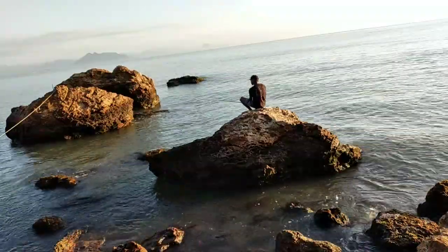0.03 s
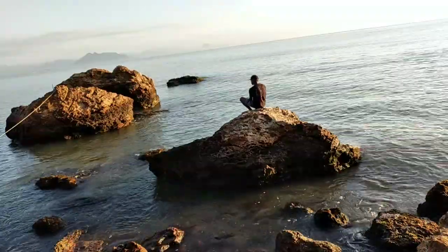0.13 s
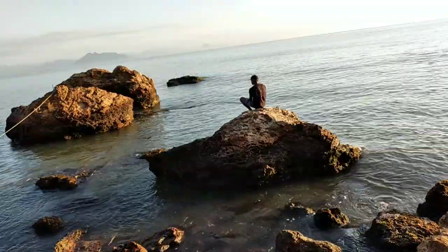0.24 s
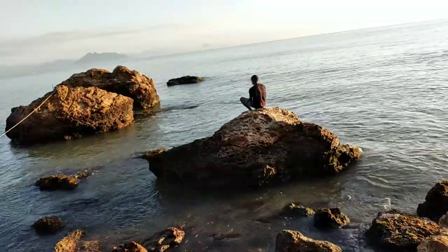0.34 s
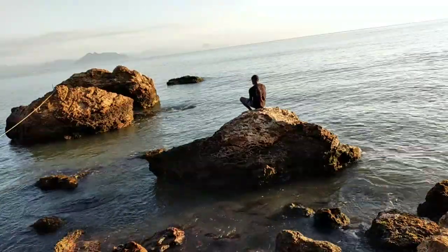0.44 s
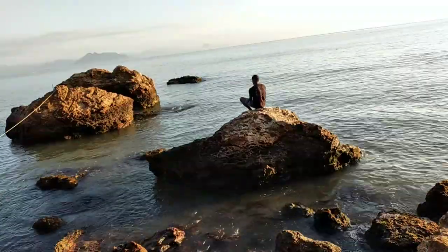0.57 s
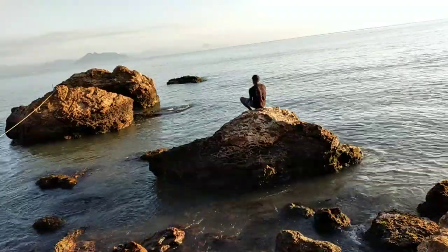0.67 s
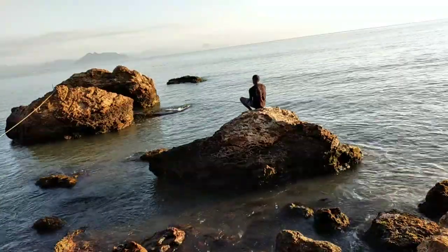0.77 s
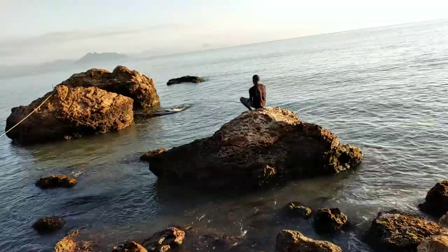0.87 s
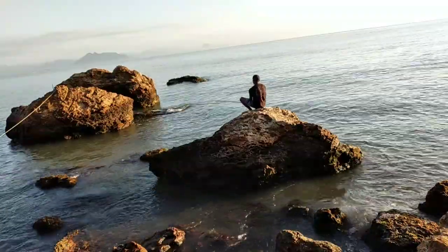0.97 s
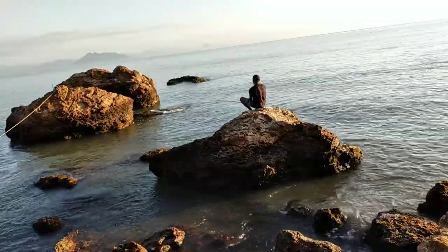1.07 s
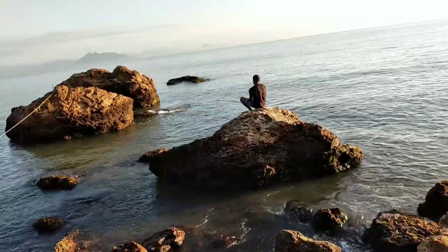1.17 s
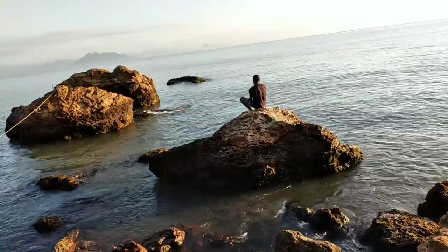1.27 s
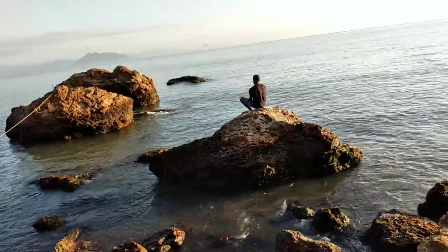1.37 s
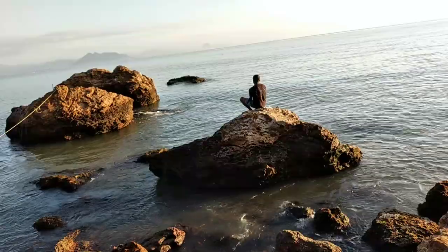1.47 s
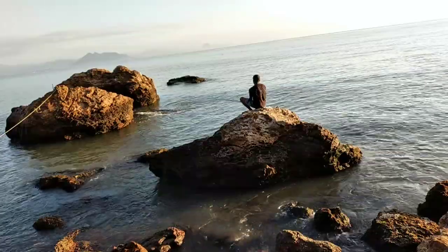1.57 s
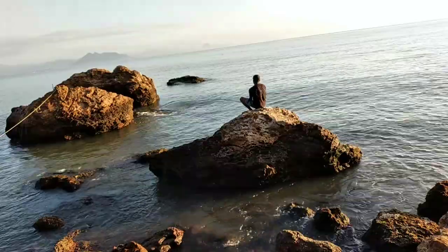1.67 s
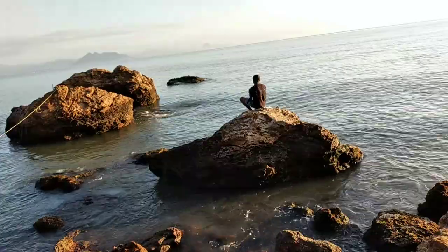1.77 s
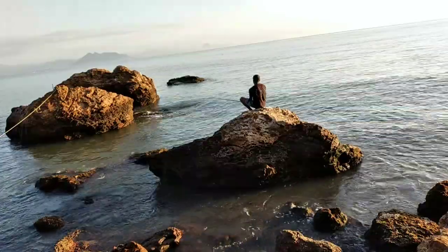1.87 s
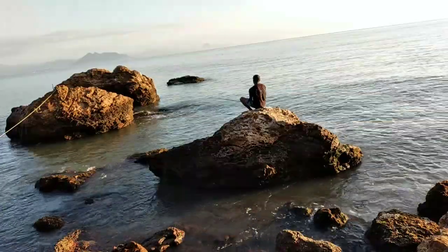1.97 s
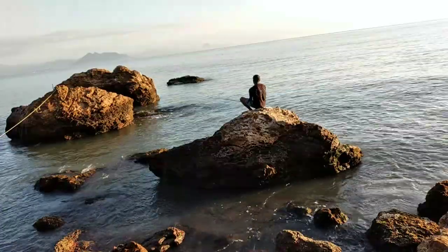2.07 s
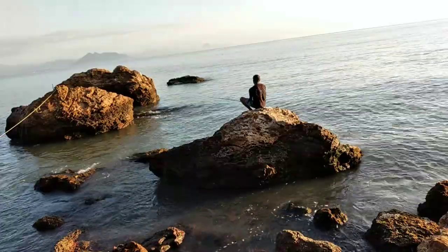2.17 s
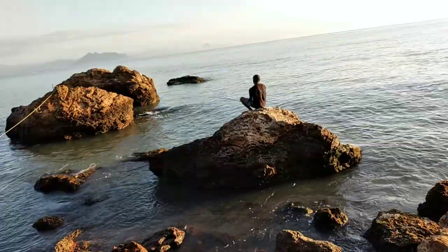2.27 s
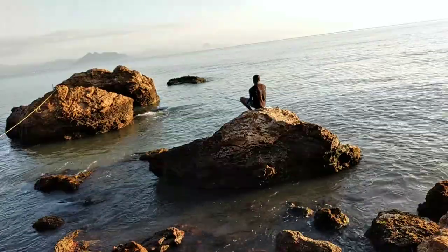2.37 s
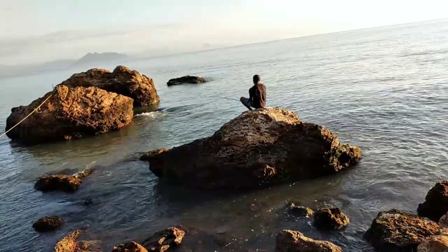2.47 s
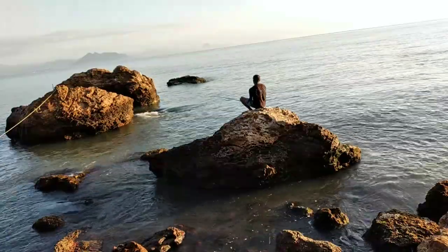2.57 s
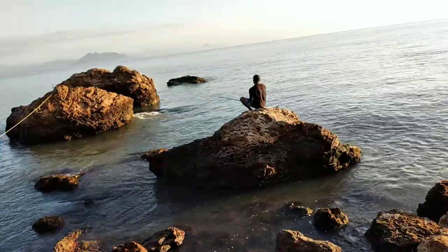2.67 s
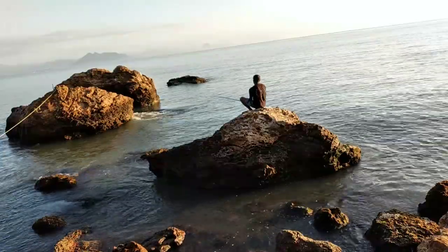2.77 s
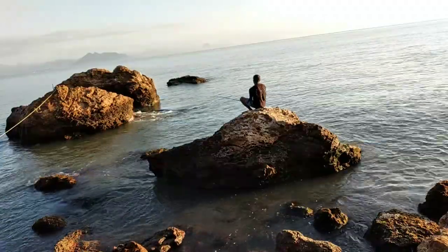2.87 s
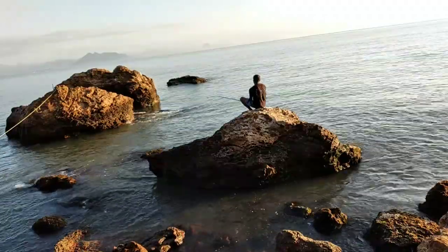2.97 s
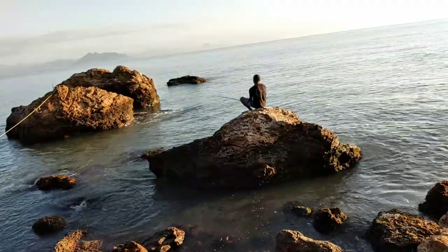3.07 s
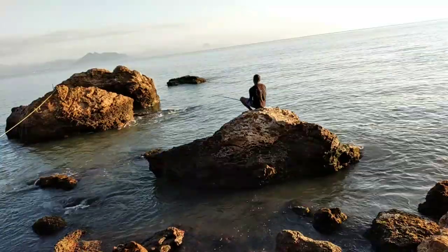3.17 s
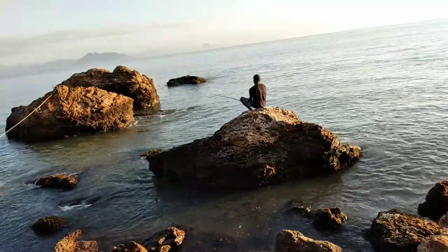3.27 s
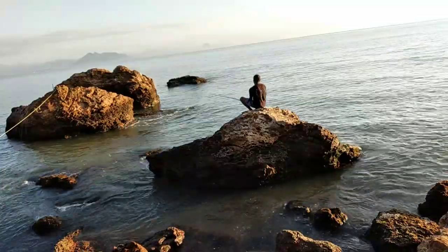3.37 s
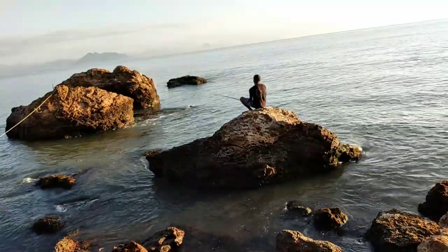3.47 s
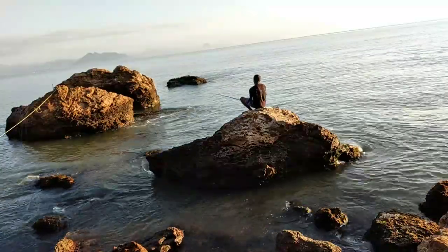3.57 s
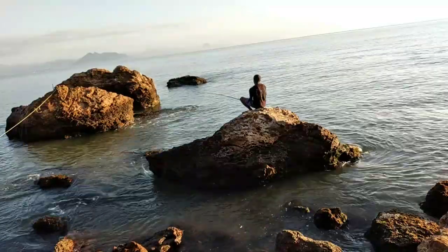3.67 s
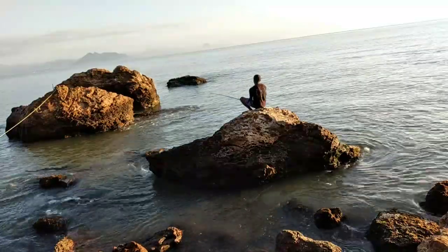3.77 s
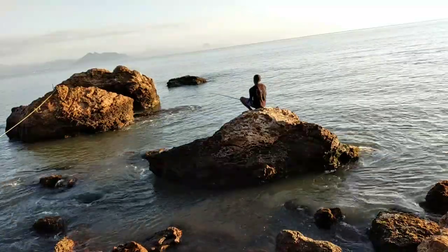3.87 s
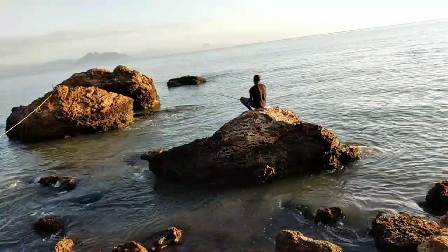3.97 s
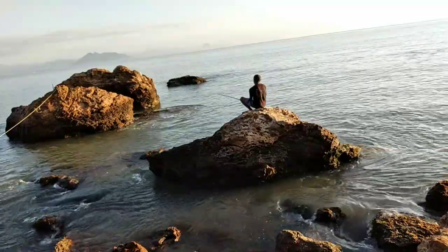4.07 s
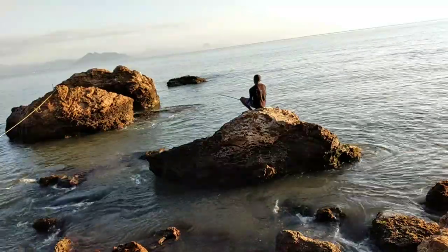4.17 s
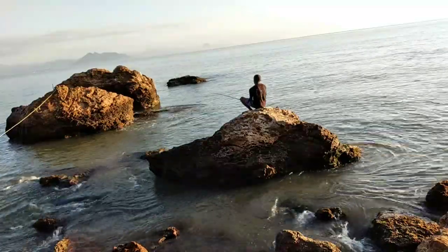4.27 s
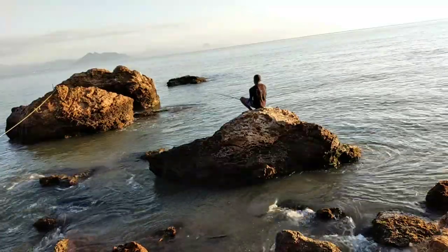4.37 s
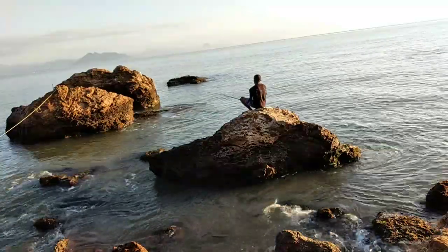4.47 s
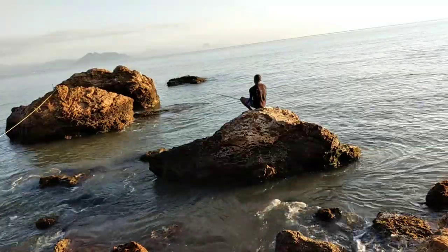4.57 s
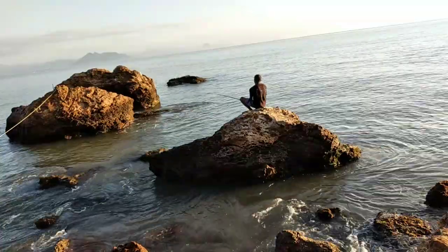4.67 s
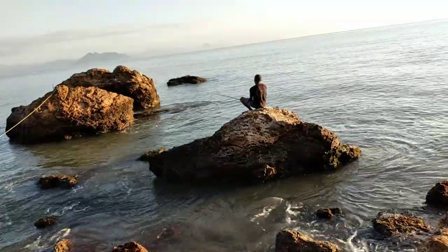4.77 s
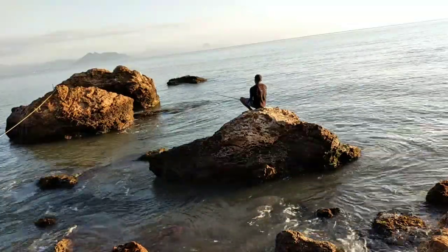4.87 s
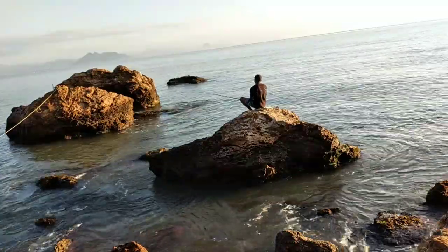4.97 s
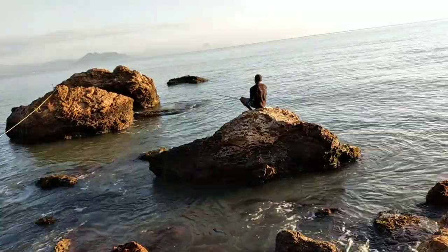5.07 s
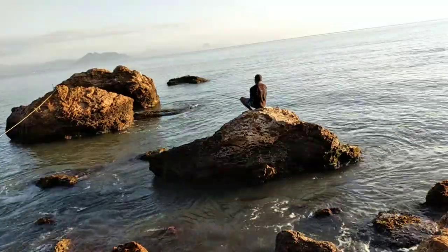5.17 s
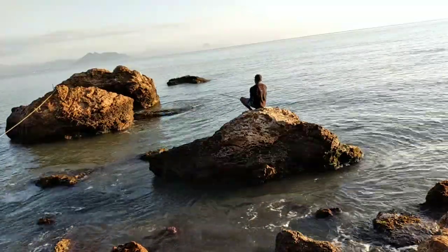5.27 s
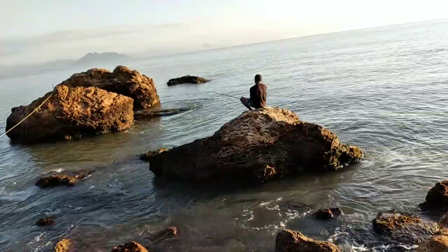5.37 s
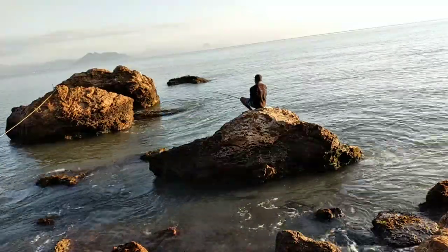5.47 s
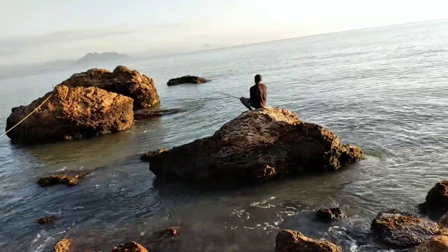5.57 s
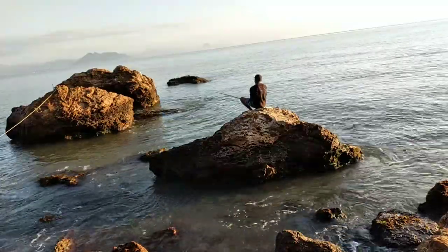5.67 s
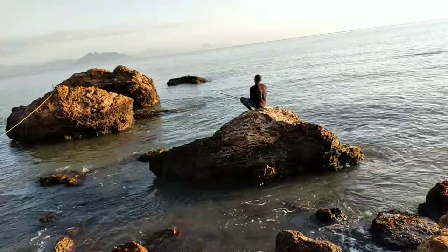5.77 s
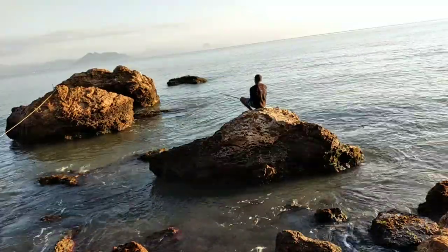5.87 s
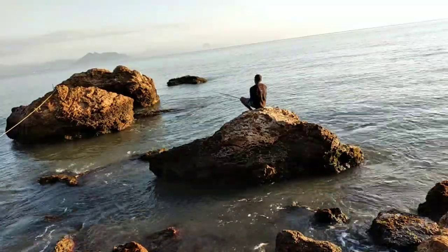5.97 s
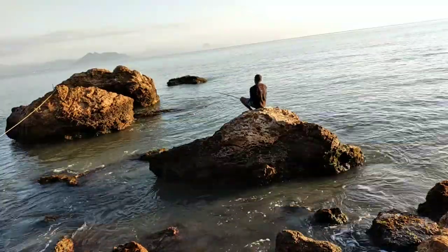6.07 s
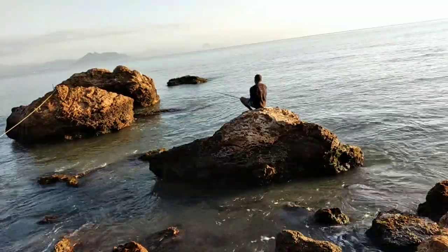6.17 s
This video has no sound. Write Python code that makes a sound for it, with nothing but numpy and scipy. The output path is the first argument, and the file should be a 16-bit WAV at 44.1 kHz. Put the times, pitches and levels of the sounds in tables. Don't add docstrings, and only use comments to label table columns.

```python
import sys
import numpy as np
from scipy import signal
from scipy.fft import rfft, irfft, next_fast_len
from scipy.io import wavfile
from scipy.ndimage import uniform_filter1d

SR = 44100
rng = np.random.default_rng(int(sys.argv[2]) if len(sys.argv) > 2 else 0)


def level_to_linear(level):
    exponent = np.asarray(level, float) / 20
    return 10 ** exponent


def store_wav(level_fs):
    pcm = np.round(np.clip(np.atleast_2d(level_fs), -1, 1) * 32767)
    wavfile.write(sys.argv[1], SR, pcm.T.astype(np.int16))


N = 274302
PADDED = next_fast_len(N, real=True)
GATE_HZ, TOP_HZ = 3770, 15770
NEAR_LEAD_MS, FAR_LAG_MS = 0.48, 0.1

# frequency in Hz, dB per Hz.
HISS_COLOUR = [(4000, -22), (4900, -16), (5150, -2), (6300, -0.5), (7500, 1), (8000, -7), (9400, -16),
               (9700, -30)]


def sea():
    # frequency in Hz, dB per Hz.
    sea_colour = [(15, -31), (25, -20.5), (55, -2.5), (92, -12.5), (137, -8), (209, -10), (271, -7.5),
                  (331, -9.5), (1350, -8), (2010, -12.5), (3000, -38.5), (3900, -70.5), (6600, -120)]
    # time in seconds, share 0-1.
    near_share = [
        (0.0, 0.7),
        (1.35, 0.71),
        (1.7, 0.52),
        (3.3, 0.17),
        (3.6, 0.92),
        (4.85, 0.74),
        (5.2, 0.07),
        (5.6, 0.85),
        (6.22, 0.53),
    ]
    *lower_db, foam_db = swell()
    shares_db = [[9.0], [6.5], [7.0], [5.5]]
    levels_db = np.array([*lower_db, foam_db]) + shares_db
    nearness = np.clip(in_time(near_share)[0], 0, 1)

    def level_db(hz):
        place = np.interp(np.log(hz), np.log([100, 280, 740, 1500]), np.arange(4))
        below = min(int(place), 2)
        return (below + 1 - place) * levels_db[below] + (place - below) * levels_db[below + 1]

    bubbles = grains(700, 3.67, 0.64, count=4)
    near, far, *own = bands(bubbles, sea_colour, 2.62, 17.7, level_db)
    near = np.sqrt(nearness) * near
    far = np.sqrt(1 - nearness) * far
    left = near + late(far, FAR_LAG_MS)
    right = late(near, NEAR_LEAD_MS) + far
    water = np.array([left, right]) + own
    lean_db = 1.7 * nearness - 0.7
    return water * level_to_linear(np.array([lean_db, -lean_db]) / 2)


def swell():
    # time in seconds, vigour as foam in dB, extra sucked through the gaps in dB.
    vigour = [(0.0, -63, 3.5), (0.6, -57, -1), (0.99, -58, 1.5), (1.18, -48, -3), (1.32, -59, 5),
              (1.85, -64.5, 1), (2.37, -58.5, -0.5), (2.75, -63.5, 3.5), (3.1, -58, -1), (3.5, -59, 1),
              (3.86, -53.5, 4.5), (4.35, -44.5, -2), (4.63, -42, -2), (4.95, -54, 2), (5.25, -57, 2.5),
              (5.6, -59, 5.5), (5.92, -62.5, 2), (6.22, -56, 0)]
    foam_db, sucked_db = in_time(vigour)
    awake_db = np.maximum(foam_db + 57, 0)
    rumble_db = -56 + 0.41 * awake_db + 0.34 * sucked_db
    gurgle_db = foam_db + sucked_db
    burble_db = -60 + 0.98 * (foam_db + 60) + 0.4 * sucked_db
    return rumble_db, gurgle_db, burble_db, foam_db


def bands(source, colour, patchy_db, flicker_hz, level_db):
    # frequency in Hz, left-right likeness 0-1.
    likeness = [(60, 0.99), (130, 1), (290, 0.9), (640, 0.15), (1400, 0.78), (3100, 0.5), (7000, .3),
                (15000, .3)]
    low_hz = colour[0][0]
    edges = low_hz * 2 ** np.arange(0, np.log2(GATE_HZ / low_hz) + 1 / 3, 1 / 3)
    together = drift(flicker_hz) + 1.18 * drift(2.0)
    out, power = 0, 0
    for k, (low, high) in enumerate(zip(edges, edges[1:])):
        sos = signal.butter(2, [low, high], "band", fs=SR, output="sos")
        parts = signal.sosfilt(sos, np.roll(source, 9173 * k, axis=1))
        hz = np.sqrt(low * high)
        alike = np.clip(at_hz(likeness, hz), 0, 1)
        flicker = 0.32 * together + drift(1.22 * flicker_hz)
        gain = level_to_linear(at_hz(colour, hz) + patchy_db * flicker)
        power += np.mean((parts[0] * gain) ** 2)
        blend = np.sqrt([[alike], [alike], [1 - alike], [1 - alike]])
        out = out + parts * (gain * level_to_linear(level_db(hz))) * blend
    return out / np.sqrt(power)


def plops(rows):
    out = np.zeros((2, N + SR))
    chance = rng.standard_normal((len(rows), 3, 17))
    knots = np.linspace(-3.5, 5.5, 17)
    for (s, level_db, hz, ms, pan_db, lead_ms), (turns, *flutter) in zip(rows, chance):
        half = ms / 2000
        for side, sign in enumerate((1, -1)):
            t = np.arange(int(8 * half * SR)) / SR + sign * lead_ms / 2000
            u = t / half - 3
            shape = np.exp(-0.75 * (u / np.where(u < 0, 0.6, 1.3)) ** 2)
            shape *= level_to_linear(2.5 * np.interp(u, knots, flutter[side]))
            waver = 0.2 * np.interp(u, knots, np.cumsum(turns))
            phase = 2 * np.pi * (hz * half * u * (1 + 0.0063 * u) + waver + turns[0])
            at = max(int((s - 3 * half) * SR), 0)
            out[side, at:at + len(u)] += level_to_linear(level_db + sign * pan_db / 2 + 0.5) * shape * np.sin(phase)
    return out[:, :N]


def rock_pockets():
    # time in seconds, peak in dB, pitch in
    # Hz, left-right in dB.
    pockets = [(0.346, -51, 171, -2), (0.773, -53, 460, -4), (0.905, -53, 80, -6), (1.094, -45.5, 66, 2),
               (1.183, -39.5, 190, 0.5), (1.221, -42.5, 470, 4), (1.266, -40.5, 434, 4.5),
               (1.321, -49, 285, 3), (1.346, -37, 118, 7), (3.054, -42, 325, 5), (3.068, -41, 490, 4),
               (3.296, -54.5, 370, -7), (3.626, -46.5, 384, 8), (3.64, -38.5, 251, 5), (3.74, -38, 350, 4),
               (3.838, -41, 524, 2), (4.128, -38, 400, -7), (4.38, -38.5, 277, 9), (4.389, -34, 393, -5),
               (4.485, -42.5, 238, -2), (4.622, -33.5, 104, -1.5), (4.649, -39.5, 202, 2),
               (4.675, -41, 420, -7), (4.692, -37, 82, -4), (4.71, -36, 130, -4), (4.771, -44.5, 284, 1),
               (4.808, -44, 283, 10), (5.205, -46.5, 266, 1), (5.257, -49, 200, 0), (5.459, -44, 260, -2),
               (0.046, -48.5, 1760, 0.5), (0.596, -46, 1810, 0.5), (0.718, -46.5, 830, 0.5),
              (1.047, -51, 1170, 12), (1.136, -36, 890, 7.5), (1.138, -36, 1360, 7), (1.207, -45, 1290, 6),
              (1.265, -44, 770, 12), (1.271, -44, 1880, 9), (2.158, -50, 2050, -0.5),
              (2.366, -47.5, 1370, 1.5), (2.829, -44.5, 1620, 1), (2.859, -46, 720, 3.5),
              (3.038, -49, 1420, -10), (3.205, -46.5, 960, -7), (3.391, -42.5, 628, -2),
              (3.62, -47, 1200, 6), (3.918, -43, 1440, 1), (3.961, -44.5, 920, 11),
              (3.993, -39.5, 2020, 13.5), (4.154, -39, 1950, 9), (4.296, -37, 1870, 4),
              (4.365, -28.5, 734, -9), (4.447, -28.5, 1110, 8.5), (4.628, -30, 1010, 2),
              (4.648, -32, 850, 8), (4.672, -37, 1160, 3), (5.24, -41.5, 1284, -4), (5.779, -44, 1330, 5.5),
              (6.147, -45.5, 545, -4)]
    s, level_db, hz, pan_db = np.transpose(pockets)
    thud_ms = 1000 * 1.6 / hz
    ring_ms = 17.6 * (hz / 300) ** -0.53
    ms = np.where(hz < 140, thud_ms, ring_ms)
    lead_ms = 0.074 + 0.06 * pan_db
    return np.transpose([s, level_db, hz, ms, pan_db, lead_ms])


def gurgles(count):
    _, gurgle_db, burble_db, _ = swell()
    when, pitch, size, cycles, pan, lead = rng.random((count, 6)).T
    thickness = np.cumsum(level_to_linear(0.75 * burble_db))
    at = np.searchsorted(thickness, when * thickness[-1]).clip(0, N - 1)
    hz = 350 * 2 ** (2.4 * pitch)
    level_db = np.where(hz < 500, gurgle_db[at], burble_db[at]) - 4 + 10 * size ** 2
    ms = (3.8 + 7.2 * cycles) * 1000 / hz
    lead_ms = np.where(burble_db[at] > -55, NEAR_LEAD_MS * lead, -FAR_LAG_MS)
    return np.transpose([at / SR, level_db, hz, ms, 8 * (pan - 0.5), lead_ms])


def slaps():
    # start in seconds, peak in dB, left-right in dB, time to fall 60 dB in seconds.
    hits = [(1.131, -37, 9.5, 0.095), (1.203, -45, 4, 0.04), (1.483, -44.5, 5, 0.019),
            (2.18, -45.5, 5, 0.03), (2.273, -45, 7, 0.028), (3.064, -46, 0, 0.016), (3.381, -49, 4, 0.014),
            (4.137, -38, 10, 0.032), (4.293, -49, 7, 0.04), (4.38, -25, 3, 0.042), (4.445, -51, 9, 0.029),
            (4.588, -33.5, 3, 0.077), (4.642, -26.5, 4, 0.05), (4.668, -30.5, 2, 0.054),
            (4.695, -25, -1, 0.029), (6.139, -61, -4, 0.027)]
    out = np.zeros((2, N + SR))
    t = np.arange(SR // 10) / SR
    sos = signal.butter(3, [250, 2200], "band", fs=SR, output="sos")
    for (s, level_db, pan_db, t60), noise in zip(hits, rng.standard_normal((len(hits), 2, len(t)))):
        noise[1] = 0.12 * late(noise[0], NEAR_LEAD_MS) + 1.22 * noise[1]
        envelope = (1 - np.exp(-t / 0.0012)) * level_to_linear(-60 * t / t60)
        burst = rms_one(signal.sosfilt(sos, noise)) * envelope
        at = int(s * SR)
        out[:, at:at + len(t)] += burst * level_to_linear(level_db + np.array([[pan_db], [-pan_db]]) / 2)
    return out[:, :N]


def spray():
    # frequency in Hz, dB per Hz.
    air_colour = [(6700, -20), (9800, -8.5), (11700, -10), (13400, -17), (TOP_HZ, -18)]
    # frequency in Hz, dB per Hz.
    edge_colour = [(2400, 7), (2900, 1), (3400, -1), (4600, -8), (5200, -5.5)]
    # time in seconds, gain in dB.
    upper_open = [
        (3.4, -4),
        (3.45, 2),
        (3.95, 2),
        (4.24, -1),
        (4.27, -4),
    ]
    left, right, air, edge = gate()
    drops = grains(1500, 3.8, 0.38, count=2)
    drops = np.vstack([np.roll(drops, 50021 * k, axis=1) for k in range(3)])
    drops = drops * level_to_linear(drift(68))
    for k in (0, 2, 4):
        drops[k + 1] = 0.17 * late(drops[k], NEAR_LEAD_MS) + 0.93 * drops[k + 1]
    hiss_edges = [3900, 5030, 6060, 7770, 10200, 11000]
    hiss = patchy(shaped(drops[:2], HISS_COLOUR), hiss_edges, 2.9, in_time(upper_open)[0])
    hiss = hiss * np.array([left, right])
    top = patchy(shaped(drops[2:4], air_colour), [8000, 12000, 16000], 1.3)
    top = top * air * level_to_linear([[-3.5], [0.5]])
    return hiss + top + shaped(drops[4:], edge_colour) * edge * level_to_linear([[2.5], [0.5]])


def gate():
    # time in seconds, hiss in dB, left-right in dB.
    wash = [
        (3.7, -85, 22),
        (3.9, -69, 15),
        (3.954, -65, 30),
        (4.174, -61, 20),
        (4.236, -67, 8),
        (4.64, -63, 6),
        (4.842, -68.5, 2.5),
        (5.01, -75.5, 10),
    ]
    # time in seconds, left hiss in dB, left-right in dB, length in ms.
    splashes = [(0.359, -74.5, 8, 25), (0.575, -73, 19, 24), (0.923, -71.5, 10, 34), (1.041, -62.5, 11, 43),
                (1.157, -49.5, 20, 51), (1.195, -59.5, 7, 47), (1.297, -49, 22, 42), (1.992, -68.5, 15, 21),
                (2.157, -67, 10, 19), (2.389, -69, 11, 22), (2.655, -77.5, 3.5, 11), (3.04, -70.5, 1, 22),
                (3.458, -62.5, 5, 27), (3.536, -59, 23, 50), (3.645, -62, 21, 24), (3.737, -54.5, 33, 48),
                (3.79, -58, 16, 32), (3.971, -52, 29, 49), (4.098, -42, 39, 31), (4.15, -60, 17, 37),
                (4.202, -47, 22, 76), (4.392, -38.5, 23, 33), (4.44, -46, 30, 53), (4.531, -52, 9, 23),
                (4.672, -42.5, 6, 40), (4.702, -43.5, 6, 47), (5.062, -67.5, 4, 32), (5.765, -81, 3, 24),
                (6.11, -65, 12, 31), (6.198, -57.5, 9, 27)]
    narrower = [
        [0.98],
        [1.1],
        [0.91],
        [0.86],
    ]
    # dB at a hiss of -70, share of the left swing, share of the right swing
    wash_air, wash_edge = (-71, 0.062, 0.34), (-64, 0.56, 0.5)
    splash_air, splash_edge = (-79, 0.42, 0.57), (-80, 0.9, 0.19)
    hiss_db, pan_db = in_time(wash, outside=-240)
    levels_db = opened(hiss_db, hiss_db - np.maximum(pan_db, 0), wash_air, wash_edge)
    power = level_to_linear(levels_db + [[6.5], [3.5], [0], [0]]) ** 2
    for s, left_db, pan_db, ms in splashes:
        u = np.abs(np.arange(N) / SR - s) / (ms / 2000)
        near = u < 4
        levels_db = opened(left_db, left_db - pan_db, splash_air, splash_edge)
        closing_db = 5.4 * (np.abs(narrower) * u[near]) ** 1.9
        power[:, near] += level_to_linear(levels_db[:, None] - 4.5 - closing_db) ** 2
    return np.sqrt(power)


def opened(left_db, right_db, air, edge):
    others = [db + left * (left_db + 70) + right * (right_db + 70) for db, left, right in (air, edge)]
    return np.array([left_db, right_db, *others])


def patchy(x, edges_hz, spread_db, upper_db=0):
    frame_s = 1024 / SR
    hz, spectrum, out = np.fft.rfftfreq(PADDED, 1 / SR), rfft(x, PADDED), 0
    frames = np.arange(0, N / SR + frame_s, frame_s)
    for low, high in zip(edges_hz, edges_hz[1:]):
        steps = uniform_filter1d(rng.standard_normal((2, len(frames))), size=2) * np.sqrt(2)
        held = level_to_linear(spread_db * steps)[:, (np.arange(N) / SR / frame_s).astype(int)]
        gain = uniform_filter1d(held, size=256)
        band = irfft(spectrum * ((hz >= low) & (hz < high)), PADDED)[:, :N]
        is_upper = high == edges_hz[-2]
        out = out + band * gain * level_to_linear(upper_db * is_upper)
    return rms_one(out)


def residue():
    # frequency in Hz, dB per Hz.
    leak_colour = [(2600, 2), (3200, 0.5), (4500, -5), (5500, -11), (9000, -11.5), (10000, -20)]
    foam_db = np.minimum(swell()[3], -57)
    white = rng.standard_normal((5, N))
    trace = shaped(white[:2], leak_colour) * level_to_linear(foam_db - 33)
    trace[0] += shaped(white[2], HISS_COLOUR) * level_to_linear(0.68 * foam_db - 52.5)
    self_noise = shaped(white[3:], [(2500, 0), (TOP_HZ, -1)]) * level_to_linear(-93.5)
    return trace + self_noise


def grains(per_s, spread_db, share, count):
    size_db = spread_db * np.minimum(rng.exponential(1, (count, N)), 4)
    sizes = level_to_linear(size_db) * rng.choice([-1, 1], (count, N))
    clicks = rms_one(sizes * (rng.random((count, N)) < per_s / SR))
    share = np.clip(share, 0, 1)
    return np.sqrt(share) * clicks + np.sqrt(1 - share) * rng.standard_normal((count, N))


def shaped(source, colour):
    hz = np.fft.rfftfreq(PADDED, 1 / SR) + 1
    inside = (hz > colour[0][0]) & (hz < colour[-1][0])
    spectrum = rfft(source, PADDED) * level_to_linear(at_hz(colour, hz)) * inside
    return rms_one(irfft(spectrum, PADDED)[..., :N])


def drift(rate):
    r = np.exp(-80 * np.pi * rate / SR)
    noise = rng.standard_normal(N // 40 + 2002)
    slow = signal.lfilter([1], [1, -2 * r, r * r], noise)[2000:]
    return np.interp(np.arange(N) / 40, np.arange(len(slow)), rms_one(slow))


def late(x, ms):
    return np.interp(np.arange(len(x)) - ms * SR / 1000, np.arange(len(x)), x)


def rms_one(x):
    return x / np.sqrt(np.mean(x ** 2) + 1e-20)


def in_time(rows, outside=None):
    s, *columns = np.transpose(rows)
    return [np.interp(np.arange(N) / SR, s, c, outside, outside) for c in columns]


def at_hz(points, hz):
    points_hz, values = np.transpose(points)
    return np.interp(np.log(hz), np.log(points_hz), values)


def scene():
    water = sea() + plops(rock_pockets()) + slaps() + plops(gurgles(count=260))
    always_passed = signal.cheby2(8, 45, GATE_HZ, fs=SR, output="sos")
    return signal.sosfilt(always_passed, water) + spray() + residue()


def top_cut(x):
    return signal.sosfilt(signal.butter(12, 15780, fs=SR, output="sos"), x)


def record(dry):
    return top_cut(dry)


dry = scene()
out = record(dry)
store_wav(out)
```